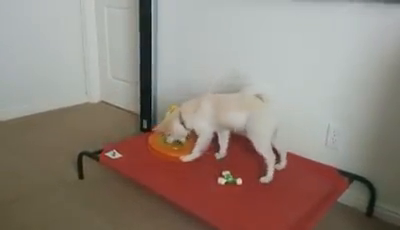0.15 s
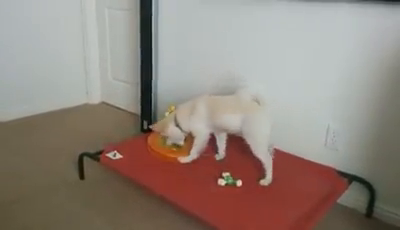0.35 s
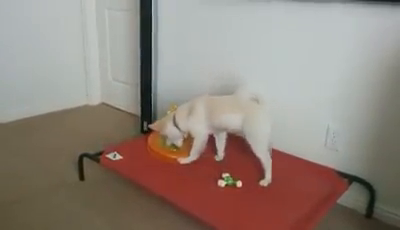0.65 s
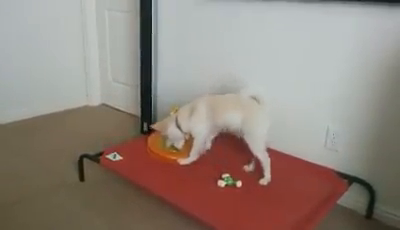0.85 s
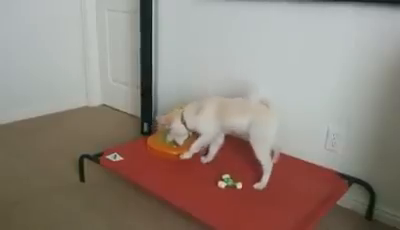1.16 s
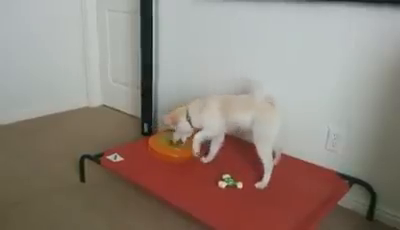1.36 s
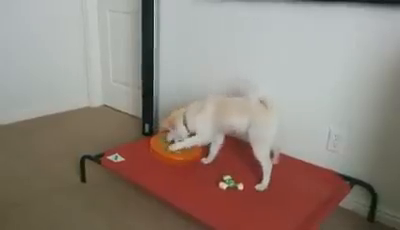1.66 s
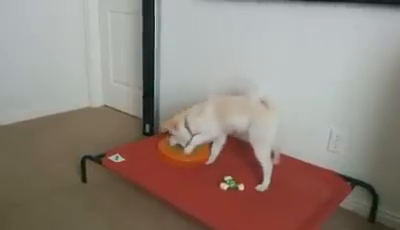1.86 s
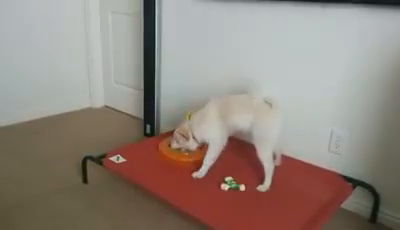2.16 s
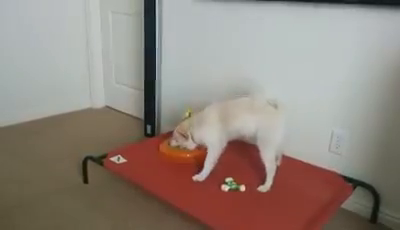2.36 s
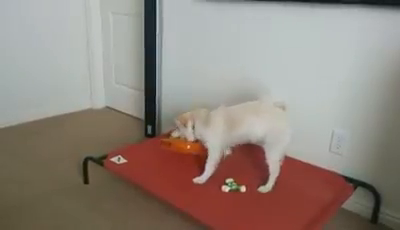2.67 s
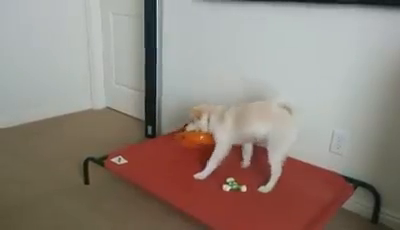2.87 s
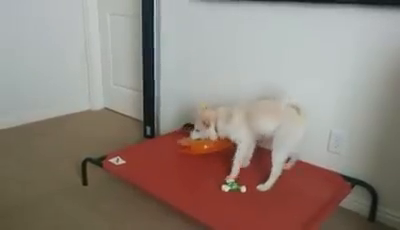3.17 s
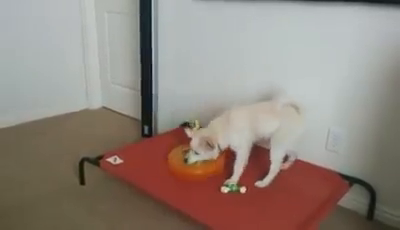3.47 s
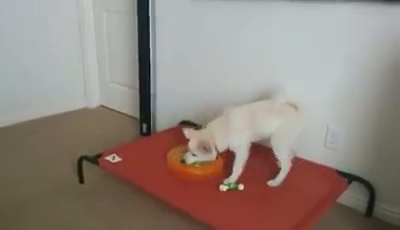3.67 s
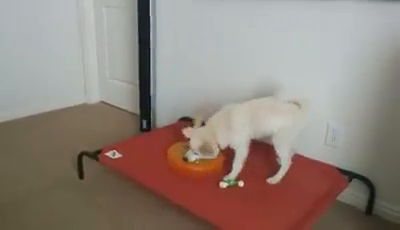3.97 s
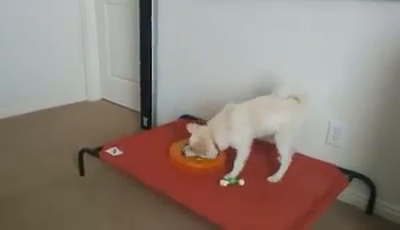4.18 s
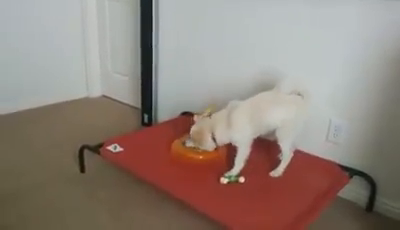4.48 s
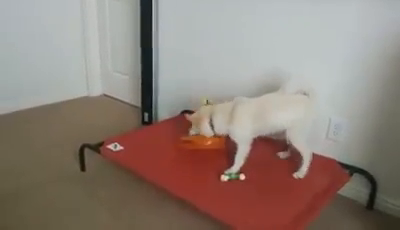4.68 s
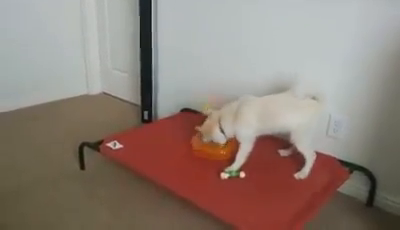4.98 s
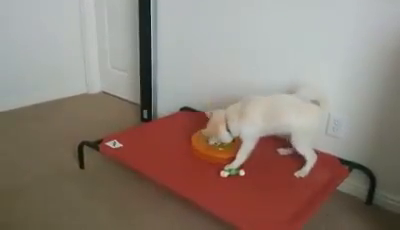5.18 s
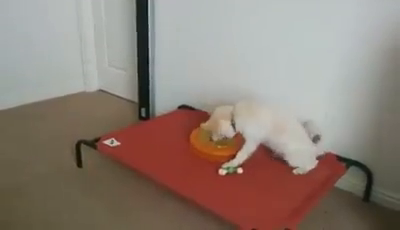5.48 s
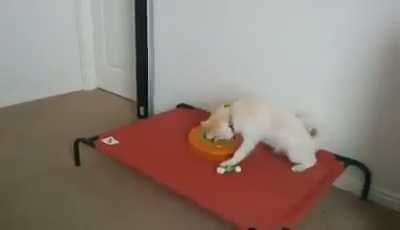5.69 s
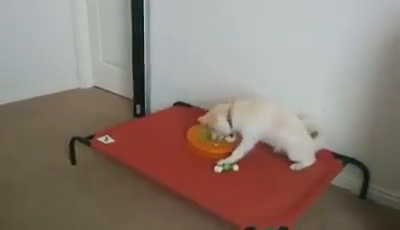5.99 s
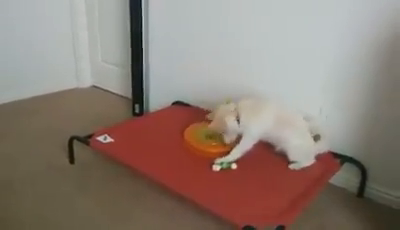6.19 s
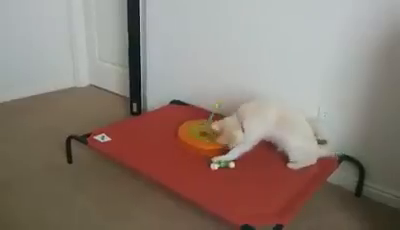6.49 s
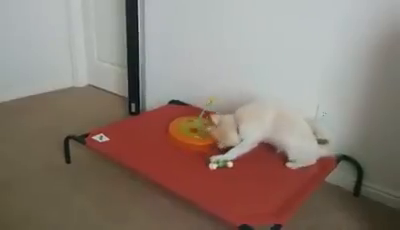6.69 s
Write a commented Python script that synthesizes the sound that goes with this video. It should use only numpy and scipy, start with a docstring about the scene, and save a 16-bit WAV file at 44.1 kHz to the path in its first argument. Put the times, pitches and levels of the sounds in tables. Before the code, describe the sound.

A puppy works at a hollow plastic treat puzzle on a taut fabric bed in a small room. A few light knocks come in the first half second, then a lull. From about 1.2 to 2 seconds, knocks build into a loud, quick clatter, with a brief scrape and the snap of a sliding piece. A loose flap slaps sharply at 2.5 seconds, followed by more knocks and a dull thump near 3. Scattered knocks and bumps continue until about 4.3. A lighter double slap comes at 4.6, then two short scrapes and soft taps. Another cluster of knocks, thumps and crisp snaps runs from 5.5 to 6.1 seconds, and one small click follows near 6.8. Cloth rustles faintly under the shifting paws throughout. Each sound dies away quickly, leaving quiet gaps with very faint low room tone and hiss.

```python
"""In a small carpeted room, a puppy noses and paws a plastic treat puzzle on a raised fabric bed.
Knocks ring the hollow tray, sliding pieces scrape and snap against their stops, a loose flap slaps,
and the toy thumps back onto the bed. Each shift of a paw jogs the toy and rubs the cloth, which also
rustles briefly after every knock on the tray. The camera's noise suppressor turns down the fading
ends and quiet gaps. Under it all lie faint, low room tone and microphone hiss."""
import sys
import numpy as np
from scipy import signal
from scipy.fft import rfft, irfft
from scipy.io import wavfile
from scipy.ndimage import uniform_filter1d

SR = 44100
rng = np.random.default_rng(int(sys.argv[2]) if len(sys.argv) > 2 else 0)


def materialize(psi):
    """Save the field psi as 16-bit PCM at rate SR to the path in sys.argv[1].

    A 1-D psi becomes a single channel; in a 2-D psi each row is a channel.
    """
    bounded = np.clip(np.atleast_2d(psi).T, -1, 1)
    quanta = np.round(bounded * 32767).astype(np.int16)
    wavfile.write(sys.argv[1], SR, quanta)


N = 302085

# The tones the toy rings at. Each row: pitch in Hz, width in Hz, height above the broad sound in dB.
TOY_TONES = [(222.7, 29, 15), (257.4, 36, 12), (382.2, 18, 16.5), (585, 76, 5.5), (638.4, 4.1, 16),
             (772.5, 9.8, 8.5), (810, 12, -9.5), (970, 29, 5), (1137, 59, 2.5), (1264, 48, -0.5),
             (1338, 18, 9), (1400, 12, 10), (1507, 68, 3), (2220, 88, 5.5), (2176, 11, 6), (2440, 51, 5),
             (3130, 110, 6), (3560, 110, 7), (3660, 860, -3)]
# A paw shifts on the tight cloth.
# Each row: start in seconds, length in seconds, level in dB, clack of the jog it gives the toy in dB.
PAW_SHIFTS = [(0.115, 0.018, -54, -13), (0.429, 0.077, -57.5, -26), (0.847, 0.05, -57.5, -23),
              (1.144, .03, -56.5, -9), (1.292, 0.12, -59.5, -7.5), (1.382, 0.026, -54.5, -8),
              (1.631, 0.14, -55, -5), (2.616, 0.25, -60, -20), (3.06, 0.074, -52.5, -29),
              (3.408, 0.025, -58.5, -8), (3.749, 0.045, -54, -11), (3.943, 0.023, -56.5, -4.5),
              (4.167, 0.22, -57, -7.5), (4.387, 0.07, -58.5, -24), (4.561, .02, -59.5, -24),
              (5.061, 0.27, -54.5, -16), (5.316, 0.19, -55.5, -8), (5.749, 0.17, -52.5, -16)]
# A nose or paw knocks the tray. Each row: start in seconds, level in dB, pitch of the spot hit in Hz,
# bed thump in dB, clack in dB. Thump and clack are counted from the level.
TRAY_KNOCKS = [ (0.017, -39, 652, -15.5, -20), (.269, -39.5, 650, -11.5, -17),
               (.342, -38.5, 600, -4.5, -31), (1.236, -37.5, 660, -10.5, -10), (1.443, -42, 630, -14, -1),
               (1.451, -41.5, 646, -18.5, 0.5), (1.519, -30, 600, 0.5, -3), (1.845, -35.5, 780, -22, -13),
               (1.864, -33.5, 720, -10, -10), (1.889, -30.5, 737, -11, -18.5),
               (1.902, -35.5, 825, -16.5, -4), (1.932, -30.5, 667, -7.5, 0), (2.194, -35, 637, -27, -17.5),
               (2.237, -38, 650, -8, 0), (2.736, -39.5, 650, -15, -14), (2.801, -34, 644, -14, -15),
               (2.815, -45, 600, 3, 3), (2.91, -34, 976, -12.5, 1.5), (2.966, -34.5, 570, 0.5, -1),
               (3.346, -39.5, 660, -8, -1.5), (3.577, -33, 666, -13.5, -8.5), (3.69, -38, 647, -14, -7),
               (3.805, -38, 982, -6.5, -7), (5.129, -46.5, 750, -22, -17), (5.168, -42, 932, -15.5, -4.5),
               (5.523, -37.5, 780, -18, -2.5), (5.568, -37.5, 530, 0, -5), (5.954, -33.5, 704, -42, -2.5)]
TRAY_RANGE_HZ = (569, 1608)
BLOW_SAMPLES = 16384  # room for one blow and its echo


def amp(db):
    """Turns decibels into a number to multiply by."""
    return 10 ** (np.asarray(db) / 20)


def evened(x):
    """Scales a sound to an average power of 1."""
    return x / np.sqrt(np.mean(x ** 2) + 1e-20)


def read(points, hz):
    """Reads between the rows of a table of frequencies and values."""
    f, value = np.transpose(points)
    return np.interp(np.log(hz + 1), np.log(f + 1), value)


def add(mix, start, sound):
    """Lays a sound into the mix at a start time in seconds."""
    part = mix[max(round(start * SR), 0):][:len(sound)]
    part += sound[:len(part)]


def tinted(x, points):
    """Shapes a sound's lows and highs from a table, at an average power of 1."""
    gain = amp(read(points, np.fft.rfftfreq(N, 1 / SR)))
    return evened(irfft(rfft(x) * gain, N))


def peak(f, hz, width, db):
    """The power of one ringing tone, spread around its pitch."""
    return amp(db) ** 2 / (1 + (2 * (f - hz) / width) ** 2)


def ringing(gain):
    """A filter with this gain that rings after a blow, never before it."""
    log_gain = np.log(np.maximum(gain, 1e-5))
    mirrored = np.r_[log_gain, log_gain[-2:0:-1]]
    return np.exp(np.conj(signal.hilbert(mirrored)))[:len(gain)]


def band(f, low, high):
    """Lets through the frequencies from low to high, with soft edges."""
    return 1 / np.sqrt((1 + (low / (f + 1)) ** 12) * (1 + (f / high) ** 24))


def room_path(click_db=-12, chatter_db=4, chatter_s=0.00052, build_s=0.00082):
    """A filter made of a click, a brief chatter of loose plastic and echoes off the nearby walls."""
    # How fast the room goes quiet. Each row: frequency in Hz, seconds to fade by 60 dB.
    fade_times = [(200, 0.23), (1500, 0.26), (10000, 0.29)]
    t = np.arange(BLOW_SAMPLES) / SR
    chatter = 1 + amp(chatter_db) * np.exp(-t / chatter_s)
    echoes = rng.standard_normal(BLOW_SAMPLES) * (1 - np.exp(-t / build_s)) * chatter
    hz, age, slices = signal.stft(echoes, SR, nperseg=256)
    faint_tail = amp(-25) * amp(-60 * age / 0.29)
    fade = np.hypot(amp(-60 * age / read(fade_times, hz)[:, None]), faint_tail)
    path = signal.istft(slices * fade, SR, nperseg=256)[1][:BLOW_SAMPLES]
    path /= np.linalg.norm(path)
    path[0] += amp(click_db)
    return rfft(path)


def blows(rows, ring_range_hz, ring_s=0.015, thump_lag_s=0.00323):
    """Each blow on the plastic makes a ring, a low thump of the bed, a clack and a high snap."""
    # The broad sound of struck plastic. Each row: frequency in Hz, level in dB.
    plastic = [(90, -6.5), (165, -6.5), (205, -1), (290, 3), (450, 5.5), (600, 6.5), (1000, 4), (1500, -2),
               (2000, 0), (3000, -3.5), (4300, -6.5), (5600, -17.5), (8800, -23.5), (9700, -33.5),
               (15000, -38.5)]
    f, out = np.fft.rfftfreq(BLOW_SAMPLES, 1 / SR), np.zeros(N)
    body = 1 + sum(peak(f, *tone) for tone in TOY_TONES)
    ring = ringing(band(f, *ring_range_hz))
    snap = ringing(band(f, 4445, 12200))
    delay = np.exp(-2j * np.pi * f * thump_lag_s)  # the soft bed gives way a moment later
    thump = ringing(band(f, 132, 459)) * delay
    for start, db, spot_hz, thump_db, clack_db, snap_db in rows:
        # Each spot on the shell brings out different tones.
        uneven_db = 2.5 * evened(uniform_filter1d(rng.standard_normal(len(f)), size=70))
        tones = np.sqrt(body + peak(f, spot_hz, width=50, db=14))
        shell = ringing(amp(read(plastic, f) + uneven_db) * tones)
        blow = shell * room_path(click_db=-10 + 0.15 * clack_db)  # hard blows open with a sharper crack
        reach = amp(0.1 * (db + clack_db + 43))  # a firmer hit is shorter, so its clack reaches higher
        clack = ringing(band(f, 1150, 4340 * reach))
        parts = ((ring, 0), (thump, thump_db), (clack, clack_db), (snap, snap_db))
        sound = sum(amp(share_db) * evened(irfft(blow * part)) for part, share_db in parts)
        # The ring carries as much energy as its level held for ring_s.
        add(out, start, amp(db) * np.sqrt(ring_s * SR / BLOW_SAMPLES) * sound)
    return out


def background(level_db=-75):
    """A faint, steady background of low room tone and microphone hiss."""
    # Each row: frequency in Hz, relative level in dB.
    background_shape = [(20, -6), (130, -3.5), (300, -7.5), (650, -5.5), (1200, -12.5), (3000, -15.5),
                        (15500, -22.5)]
    return amp(level_db) * tinted(rng.standard_normal(N), background_shape)


def rubbing_strength(rise_s=0.022, release_s=0.03, settle_db=-18, settle_s=0.11, stir_db=-73):
    """How hard the cloth is rubbed: paws press and let go, and it settles after each tray knock."""
    t = np.arange(SR) / SR
    power = np.full(N, amp(stir_db) ** 2)  # the cloth is never quite still under the puppy
    for start, length, db, _ in PAW_SHIFTS:
        press = np.minimum(t / rise_s, 1)
        let_go = np.exp(-np.maximum(t - length, 0) / release_s)
        add(power, start, (amp(db) * press * let_go) ** 2)
    for start, db, *_ in TRAY_KNOCKS:
        add(power, start, (amp(db + settle_db) * np.exp(-t / settle_s)) ** 2)
    return np.sqrt(power)


def cloth_rustle(slips_per_s=70, spread_db=4.5, slip_s=0.03):
    """Cloth sticks and slips under the paws in small uneven bursts."""
    # The sound of rubbed cloth. Each row: frequency in Hz, relative level in dB.
    cloth_shape = [(80, -15), (150, -23), (230, 0), (400, -0.5), (650, 4.5), (1000, -4), (2000, -22.5),
                   (15000, -30.5)]
    slip_power = amp(spread_db * np.minimum(rng.exponential(1, N), 3)) ** 2
    slips = slip_power * (rng.random(N) < slips_per_s / SR)
    bursts = np.sqrt(signal.lfilter([1], [1, -np.exp(-1 / (slip_s * SR))], slips))
    return rubbing_strength() * tinted(bursts * rng.standard_normal(N), cloth_shape)


def through_toy(rustle, tones_db=-9):
    """The toy rests on the cloth, so the rubbing makes it ring a little."""
    f = np.fft.rfftfreq(N, 1 / SR)
    body = np.sqrt(1 + amp(tones_db) ** 2 * sum(peak(f, *tone) for tone in TOY_TONES))
    return np.std(rustle) * evened(irfft(rfft(rustle) * ringing(body), N))


def scrapes(fade_db=6):
    """A piece rubs along its track and hisses around one pitch, easing off as it slows."""
    # Each row: start in seconds, end in seconds, pitch in Hz, width in Hz, level in dB.
    slides = [(1.662, 1.758, 4670, 800, -61), (1.657, 1.758, 6600, 800, -59),
              (1.699, 1.724, 3200, 2400, -46), (4.013, 4.17, 1900, 900, -66.5),
              (4.759, 4.8, 1650, 1210, -51.5), (4.864, 4.912, 1390, 600, -50),
              (5.897, 5.924, 1820, 350, -52.5)]
    f, out = np.fft.rfftfreq(BLOW_SAMPLES, 1 / SR), np.zeros(N)
    for start, end, hz, width, db in slides:
        n = max(round((end - start) * SR), 2)
        rub = rng.standard_normal(n) * amp(np.linspace(0, -fade_db, n))
        sound = irfft(rfft(rub, BLOW_SAMPLES) * room_path() * ringing(peak(f, hz, width, 0)))
        add(out, start, amp(db) * np.sqrt(n / BLOW_SAMPLES) * evened(sound))
    return out


def paw_jogs(above_rub_db=6.5, pitch_hz=641, thump_db=-4, snap_db=-31):
    """The toy gets a soft, dull bump as each paw starts to move."""
    rows = [(start, db + above_rub_db, pitch_hz, thump_db, clack_db, snap_db)
            for start, _, db, clack_db in PAW_SHIFTS]
    return blows(rows, TRAY_RANGE_HZ)


def flap_slaps(thump_db=-29.5, snap_db=-11.5):
    """A loose flap slaps against its stop as the puppy lifts the toy."""
    # Each row: start in seconds, level in dB, pitch in Hz, clack in dB counted from the level.
    slaps = [(2.489, -32, 1150, -11.5), (2.51, -29.5, 1215, -8), (4.612, -39, 1100, -9),
             (4.632, -40, 1183, 3)]
    rows = [(start, db, hz, thump_db, clack_db, snap_db) for start, db, hz, clack_db in slaps]
    return blows(rows, ring_range_hz=(803, 1610))


def slider_snaps(thump_db=-28.5, clack_db=4.5):
    """Light, hard sliding pieces clack and snap against their stops, hardly moving the bed."""
    # Each row: start in seconds, level in dB, pitch in Hz, snap in dB counted from the level.
    stops = [(.014, -57.5, 616, -1.5), (.356, -61.5, 616, -0.5), (1.743, -39.5, 792, 1.5),
             (4.294, -41, 1120, -6.5), (5.7, -50.5, 1437, 13.5), (5.759, -51, 736, -2),
             (5.807, -46.5, 1830, 4), (5.82, -43, 1570, 4.5), (6.085, -40.5, 774, 0), (6.767, -48, 747, 5)]
    rows = [(start, db, hz, thump_db, clack_db, snap_db) for start, db, hz, snap_db in stops]
    return blows(rows, ring_range_hz=(647, 1670))


def toy_landings(pitch_hz=516, clack_db=-7.5, snap_db=-29):
    """The whole toy drops flat onto the bed with a dull thump."""
    # Each row: start in seconds, level in dB, bed thump in dB counted from the level.
    drops = [(.361, -48.5, 1), (1.526, -41.5, 3.5), (2.266, -46, 5.5), (2.52, -48.5, 0), (2.967, -47.5, 5),
             (3.83, -39.5, -1), (4.33, -41, -3), (5.581, -42.5, 1)]
    rows = [(start, db, pitch_hz, thump_db, clack_db, snap_db) for start, db, thump_db in drops]
    return blows(rows, TRAY_RANGE_HZ)


def tray_knocks(strong_db=-33):
    """A nose or paw rings the hollow tray; stronger, harder knocks have more snap."""
    rows = []
    for start, db, hz, thump_db, clack_db in TRAY_KNOCKS:
        snap_db = -15 + 1.4 * (db - strong_db) + 0.44 * clack_db
        rows.append((start, db, hz, thump_db, clack_db, snap_db))
    return blows(rows, TRAY_RANGE_HZ)


def scene():
    """The toy's knocks, snaps and scrapes over the rustle of the bed, in one channel."""
    toy = tray_knocks() + toy_landings() + slider_snaps() + flap_slaps() + paw_jogs() + scrapes()
    return (toy + through_toy(cloth_rustle()))[None]


def record(dry, threshold_db=-45.5, depth_db=13.0, softness_db=3.0, top_hz=15800):
    """The noise suppressor turns down quiet moments; the background is added and the top treble cut."""
    level_db = 10 * np.log10(abs(uniform_filter1d(dry[0] ** 2, size=400)) + 1e-12)
    shut = .5 - .5 * np.tanh((level_db - threshold_db) / (2 * softness_db))  # 1 when quiet, 0 when loud
    quieted = dry * amp(-depth_db * uniform_filter1d(shut, size=150))
    treble_cut = signal.firwin(511, top_hz, window=("kaiser", 9), fs=SR)
    return signal.oaconvolve(quieted + background(), treble_cut[None], "same")


dry = scene()
out = record(dry)
materialize(out)
```